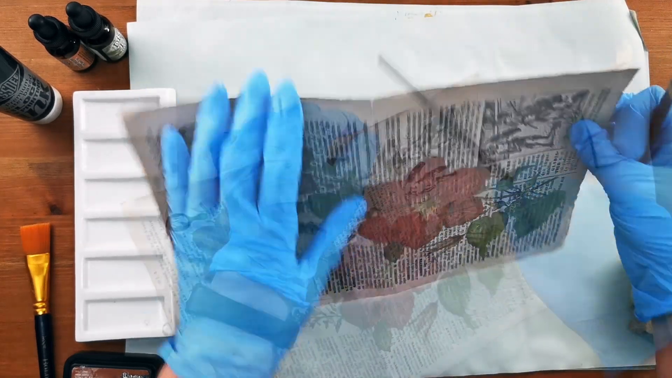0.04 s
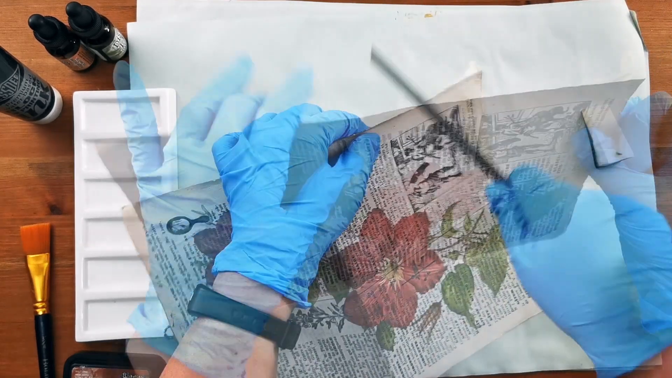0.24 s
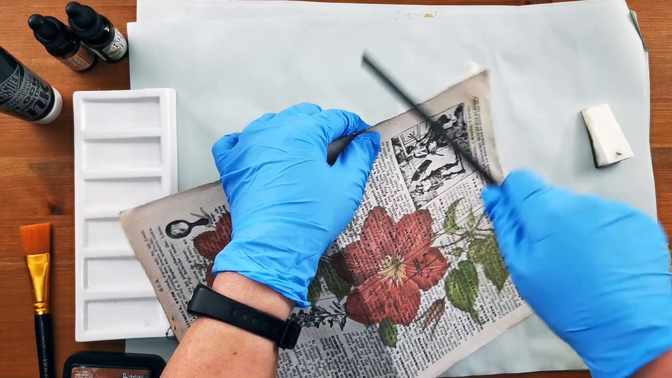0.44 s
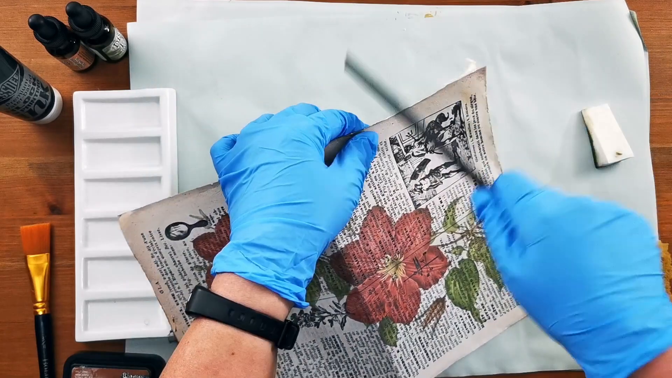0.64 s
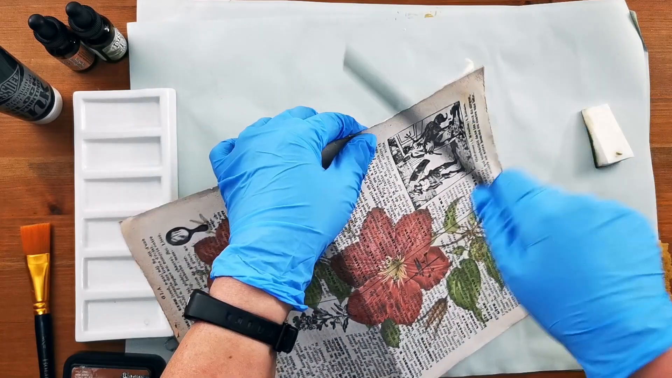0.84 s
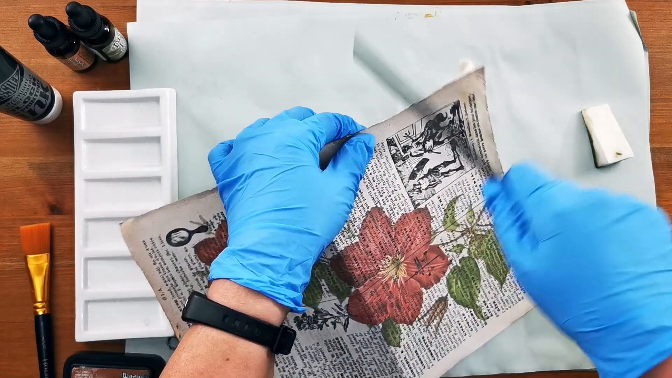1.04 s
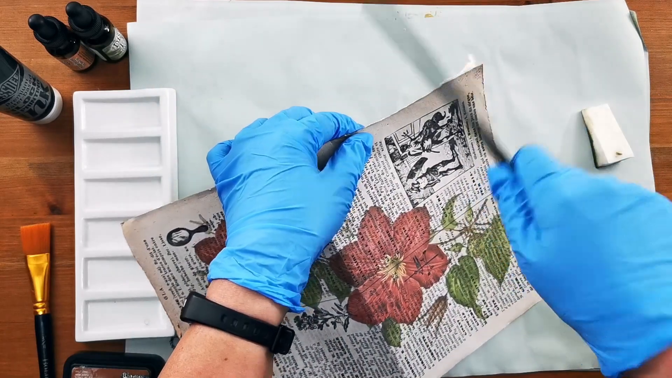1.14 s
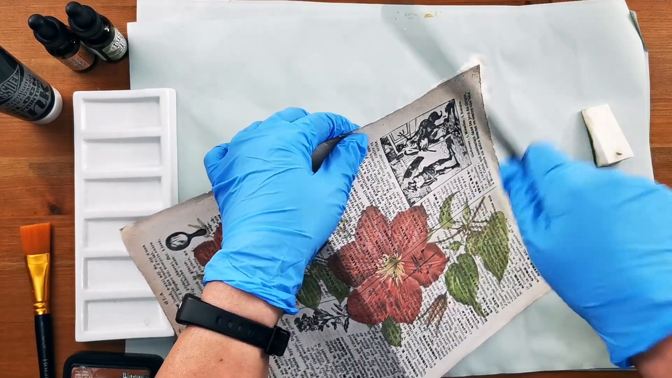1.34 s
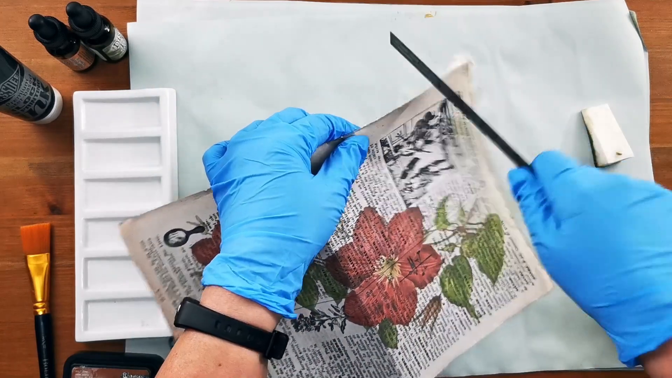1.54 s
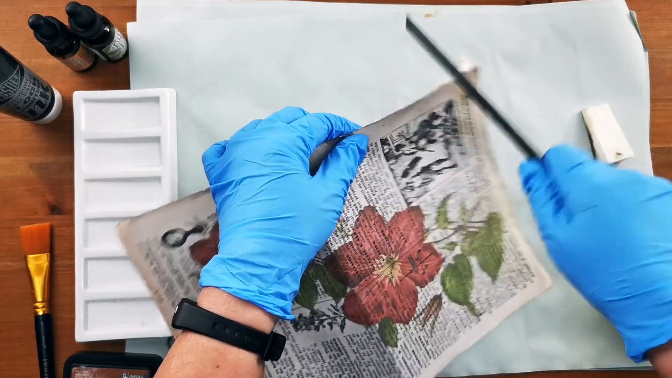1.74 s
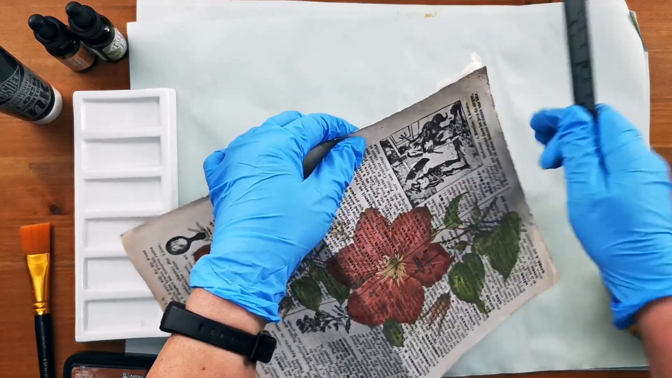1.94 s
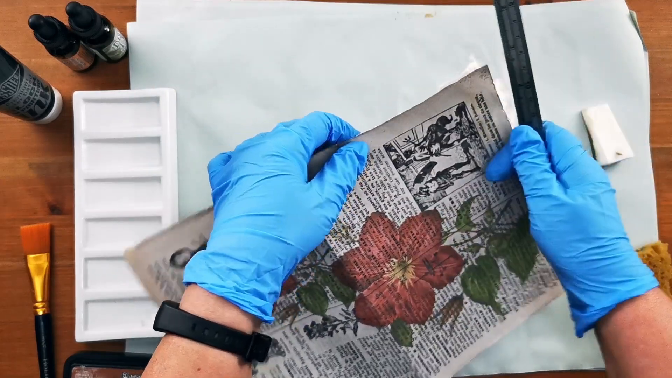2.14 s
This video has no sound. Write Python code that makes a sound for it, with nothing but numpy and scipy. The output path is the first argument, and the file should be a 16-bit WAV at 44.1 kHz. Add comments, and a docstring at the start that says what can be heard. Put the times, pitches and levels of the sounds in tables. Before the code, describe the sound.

A steel ruler is whipped along a stiff paper edge in short, hollow, clacking strokes. Paper rustles from 0 to 0.3 seconds, with a faint stroke at 0.1 and a firmer one at 0.3. Loud cracks follow roughly every 0.19 seconds until 1.8, with a tiny bright double tick near 0.95 and small late rebounds. Short room tails fade into light rustling around 1.9 to 2.2; close, bass-light, peaks clipped.

```python
"""A steel ruler is whipped along the edge of a stiff paper sheet over a craft table, about five strokes a second.
Each stroke excites decaying modes of sheet and blade (knock and crack), then a noisy room tail swells and fades.
The sheet rustles in gloved hands as shaped noise; light touches and small ticks ring as dying sines.
Low noise after each stroke is the table's shudder; the loudest blows overload the microphone and are clipped."""
import sys
import numpy as np
from scipy import signal
from scipy.fft import rfft, irfft
from scipy.io import wavfile
from scipy.ndimage import uniform_filter1d

SR = 44100
rng = np.random.default_rng(int(sys.argv[2]) if len(sys.argv) > 2 else 0)


def dump_mix(stems):
    """Bounce the given channels to the path in sys.argv[1] as a 16-bit WAV at rate SR."""
    frames = np.atleast_2d(stems).T  # one column per channel
    limited = np.clip(frames, -1, 1)  # hard clip at full scale
    pcm = np.round(limited * 32767).astype(np.int16)
    wavfile.write(sys.argv[1], SR, pcm)


def amplitude_ratio(level_db):
    """Convert a level in decibels to the matching linear amplitude (field) ratio."""
    exponent = np.asarray(level_db, float) / 20
    return 10 ** exponent


N = 97020  # samples

# Strokes of the ruler on the sheet. Each row: start in seconds, sheet blow in dB, hollow knock in dB, crack in dB,
# favoured sheet mode in Hz, favoured blade mode in Hz, room tail in dB, tail brightness in dB per octave.
RULER_STROKES = [(0.1102, -27.5, -35.5, -33, 1630, 4100, -31.5, -0.5),
                 (0.2948, -17, -19, -28.5, 1370, 5000, -29.5, -3),
                 (0.4718, -9, -11.5, -14.5, 1940, 4450, -25.5, -2.5),
                 (.6577, -15, -13, -14, 1370, 5800, -28, -1.5),
                 (0.8468, -16.5, -9, -28.5, 2440, 4680, -28, -4),
                 (1.0398, -15, -6, -15.5, 1830, 4660, -26, -3),
                 (1.2381, -9, -9, -21, 1370, 5000, -24.5, -3),
                 (1.4209, -8, -10, -12.5, 1100, 6500, -23.5, -3),
                 (1.6088, -11, -10, -12.5, 1070, 5900, -24, -3),
                 (1.7948, -12, -11.5, -28, 984, 4300, -24, -4.5)]


def evened(x):
    """Normalisation: scales a signal to rms 1."""
    return x / np.sqrt(np.mean(x ** 2) + 1e-20)


def read(points, hz):
    """Interpolation on a logarithmic frequency axis."""
    f, value = np.transpose(points)
    return np.interp(np.log(hz + 1), np.log(f + 1), value)


def add(mix, s, sound):
    """Superposition: sums a sound into the mix from time s."""
    part = mix[round(s * SR):][:len(sound)]
    part += sound[:len(part)]


def unit(points, hz):
    """Spectral envelope: amplitudes from a dB table, scaled to rms 1 over the bins."""
    return evened(amplitude_ratio(read(points, hz)))


def coloured(points, count):
    """Filtered noise: white noise weighted by a spectrum, rms 1."""
    spectrum = rfft(rng.standard_normal(count))
    gain = amplitude_ratio(read(points, np.fft.rfftfreq(count, 1 / SR)))
    return evened(irfft(spectrum * gain, count))


def noise(field, patchy_db, grainy_db):
    """Short-time synthesis: random spectra shaped by field(hz, t), with patches and per-frame flicker."""
    frames = N // 64 + 5
    hz = np.fft.rfftfreq(256, 1 / SR)[:, None]
    real, imag, patches = rng.standard_normal((frames, 129, 3)).T
    patches = uniform_filter1d(patches, size=6, axis=0)  # across frequency
    patches = evened(uniform_filter1d(patches, size=10, axis=1))  # across time
    flicker = evened(uniform_filter1d(rng.standard_normal(frames), size=3))
    shape = field(hz, np.arange(frames) * 64 / SR)
    z = (real + 1j * imag) * shape * amplitude_ratio(patchy_db * patches + grainy_db * flicker)
    return signal.istft(z, nperseg=256, noverlap=192)[1][:N] / 16


def struck(modes, detune, scatter_db, seconds, count=1):
    """Modal decay: dying sines, count randomly detuned lines per mode, scaled to a starting power of 1."""
    hz, db, t60 = np.transpose(list(modes) * count)[:, :, None]
    t = np.arange(0, seconds, 1 / SR)
    level_draw, pitch_draw = rng.standard_normal((len(hz), 2)).T[:, :, None]
    size = amplitude_ratio(db + scatter_db * level_draw)
    lines = size * amplitude_ratio(-60 * t / t60) * np.sin(2 * np.pi * hz * (1 + detune * pitch_draw) * t)
    return lines.sum(0) / np.sqrt((size ** 2).sum() / 2)


def favoured(modes, near_hz):
    """Position-dependent excitation: lifts the modes that the place of the blow excites best."""
    lift_db, width_octaves = 5, 0.18
    return [(hz, db + lift_db * np.exp(-(np.log2(hz / near_hz) / width_octaves) ** 2), t60)
            for hz, db, t60 in modes]


def burst(points, db, t60):
    """Exponential decay: a dying puff of coloured noise."""
    t = np.arange(0, .08, 1 / SR)
    return amplitude_ratio(db - 60 * t / t60) * coloured(points, count=len(t))


def room_quiet():
    """Background noise: a steady random signal with a fixed spectrum."""
    # Noise spectrum of the room. Each row: frequency in Hz, relative density in dB per Hz.
    room_spectrum = [(15, -35), (25, -17), (102, -3), (463, -19.5), (607, 5.5), (911, -3), (1650, 0),
                     (2220, -7), (4370, -7.5), (12500, -19), (16000, -21)]
    return amplitude_ratio(-53) * coloured(room_spectrum, count=N)


def rustle(hz, t):
    """Friction noise as gloved hands shift the sheet: powers of two long stretches and brief fidgets add."""
    # Rustling paper. Each row: frequency in Hz, relative density in dB per Hz.
    paper_spectrum = [(88, -45), (150, -34), (475, -33), (612, -12), (905, -31), (1340, -1), (1630, -13),
                      (1870, -4.5), (8070, -8.5), (16000, -17.5)]
    # Two long stretches. Each row: time in seconds, level in dB, brightness in dB per octave.
    stretches = [
        [(0.0, -37, -3.5), (0.084, -34.5, 0), (0.102, -43, 1.5), (0.108, -38, 4), (0.136, -28.5, 2.5),
         (0.176, -44, 6), (0.242, -36, 0), (0.286, -69, 13), (0.29, -60, 0)],
        [(1.88, -44.5, 5), (1.898, -46, -0.5), (1.954, -33.5, 3.5), (1.984, -43.5, 2), (2.1, -49.5, 0),
         (2.106, -46, -4), (2.138, -53, 7), (2.156, -45, -13.5), (2.17, -46, -2), (2.194, -42, 1.5),
         (2.2, -42, -13)],
    ]
    # Brief shifts of the sheet. Each row: centre in seconds, level in dB, half length in seconds.
    brief_shifts = [(0.357, -50, 0.01), (0.385, -59, .008), (0.465, -43.5, .015), (.63, -68, .015),
                    (0.999, -42, 0.016), (1.197, -66, .008), (1.357, -43.5, 0.017), (1.546, -43.5, 0.0077),
                    (1.719, -43, .012)]
    power = sum(amplitude_ratio(2 * db) * np.exp(-((t - s) / half_s) ** 2) for s, db, half_s in brief_shifts)
    for rows in stretches:
        s, db, tilt_db = np.transpose(rows)
        outside_s = np.maximum(np.maximum(s[0] - t, t - s[-1]), 0)
        level_db = np.interp(t, s, db) - 600 * outside_s  # fades at 600 dB/s beyond its ends
        octaves = np.log2((hz + 1000) / 5000)
        power = power + amplitude_ratio(2 * level_db + 2 * np.interp(t, s, tilt_db) * octaves)
    return unit(paper_spectrum, hz) * np.sqrt(power)


def blow(blow_db, knock_db, crack_db, sheet_hz, blade_hz):
    """Impact excitation: a quick cluster of ticks rings sheet and blade, with a knock, a slap and a crackle."""
    # Modes of the sheet over the table. Each row: frequency in Hz, relative level in dB, t60 in seconds.
    knock_modes = [(636.4, 17, 0.035), (560, -13, 0.006), (674, 13.5, 0.027), (747, 2, 0.026),
                   (850, 4, 0.0083), (304, -7, 0.032)]
    # Modes of the sheet alone. Each row: frequency in Hz, relative level in dB, t60 in seconds.
    sheet_modes = [(1056, -4.5, 0.065), (1370, 9.5, 0.015), (1798, 6.5, 0.019), (2146, 2.5, 0.016),
                   (2350, -5.5, 0.066), (2716, -15, 0.078), (3140, -7, 0.061), (3717, -0.5, 0.029),
                   (4250, -12, 0.012)]
    # Modes of the steel blade. Each row: frequency in Hz, relative level in dB, t60 in seconds.
    blade_modes = [(4540, -9.5, 0.012), (4950, -0.5, 0.011), (5240, -2.5, .012), (5780, -2, .013),
                   (6575, 1.5, .014), (7120, 1, 0.012), (7920, -8, 0.011), (7930, -7, 0.0081),
                   (9120, -3, 0.013), (10000, -5.5, 0.0089), (11330, -8, 0.0092), (12000, -3, .011),
                   (13000, -2, .01)]
    # Slap that goes with the blow. Each row: frequency in Hz, relative density in dB per Hz.
    slap_spectrum = [(300, -54), (600, 1.5), (1500, -4), (2400, -6), (3500, -12), (5500, -25), (16000, -64)]
    # Crackle that goes with the crack. Each row: frequency in Hz, relative density in dB per Hz.
    crackle_spectrum = [(1000, -52), (3000, -4.5), (4700, 5.5), (7000, -3.5), (11000, -5.5), (14000, -11.5),
                        (16000, -9)]
    contact_s, contact_ticks, later_size = .003, 10, .55  # largest later tick beside the first
    knock_rise_s = 0.0022

    draws = rng.random((contact_ticks, 2))
    hit = np.zeros(600)
    places = (draws[1:, 0] * contact_s * SR).astype(int)
    np.add.at(hit, places, later_size * (2 * draws[1:, 1] - 1))  # either sign
    hit[0] = 1

    t = np.arange(0, .08, 1 / SR)
    knock = struck(knock_modes, 0.0057, 0.54, len(t) / SR)[:len(t)]
    out = amplitude_ratio(knock_db) * (1 - np.exp(-t / knock_rise_s)) * knock
    for db, modes, hz in (blow_db, sheet_modes, sheet_hz), (crack_db, blade_modes, blade_hz):
        ring = struck(favoured(modes, hz), 0.042, 2.5, len(t) / SR, count=5)
        ring = np.convolve(ring, hit)[:len(t)]
        out = out + amplitude_ratio(db) * ring / np.std(ring[:SR // 200])  # level set over the first 5 ms
    slap = burst(slap_spectrum, blow_db - 2.5, 0.028)
    crackle = burst(crackle_spectrum, crack_db + 1, .024)
    return out + slap + crackle


def blows():
    """Repeated impact: superposes all landings and rebounds of the ruler."""
    # Rebounds of the ruler. Each row: start in seconds, sheet blow in dB, knock in dB, crack in dB,
    # favoured sheet mode in Hz, favoured blade mode in Hz.
    bounces = [(1.4491, -41, -41, -33.5, 3500, 4540), (1.4539, -24, -25, -38, 1010, 5000),
               (1.632, -27.5, -38, -49, 1100, 5000), (1.638, -23.5, -18, -31.5, 1920, 4940),
               (1.816, -23, -25, -45, 1190, 5000)]
    out = np.zeros(N)
    for row in list(RULER_STROKES) + list(bounces):
        add(out, row[0], blow(*row[1:6]))
    return out


def room_tail(hz, t):
    """Reverberation: after each blow a noisy tail swells slightly, then decays at a rate set by frequency."""
    # Room tail. Each row: frequency in Hz, relative density in dB per Hz.
    tail_spectrum = [(59, -49), (100, -47), (322, -22.5), (801, -3), (1010, -13), (1450, -1.5),
                     (2040, -6.5), (2220, -9.5), (3470, -9), (11600, -15), (16000, -20)]
    # Decay of the room tail. Each row: frequency in Hz, t60 in seconds.
    tail_decay = [(250, 0.16), (660, 0.3), (1740, 0.34), (4590, 0.33), (12100, 0.26)]
    peak_s, rise_s, start_db = 0.035, 0.0051, -1.5
    power = 0
    for s, *_, db, tilt_db in RULER_STROKES:
        u = t - s - peak_s
        swell = np.exp(-(np.minimum(u, 0) / rise_s) ** 2)
        rise = amplitude_ratio(start_db) + (1 - amplitude_ratio(start_db)) * swell
        tilt = tilt_db * np.log2((hz + 100) / 1500)
        fade = amplitude_ratio(db + tilt - 60 * np.maximum(u, 0) / read(tail_decay, hz))
        begun = t > s + .007
        power = power + (begun * rise * fade) ** 2
    return unit(tail_spectrum, hz) * np.sqrt(power)


def thuds():
    """Structure-borne sound: each stroke leaves a faint low shudder in the table, rising then decaying."""
    # Shudder of the table top. Each row: frequency in Hz, relative density in dB per Hz.
    table_spectrum = [(25, -6), (60, -11), (105, -5), (160, -7.5), (300, -4), (450, -25), (900, -55)]
    over_tail_db, rise_s, t60 = -23.5, 0.018, 0.31
    strokes = np.array(RULER_STROKES)
    u = np.maximum(np.arange(N) / SR - strokes[:, :1], 0)
    size = amplitude_ratio(strokes[:, 6:7] - 60 * u / t60) * (1 - np.exp(-u / rise_s))
    return amplitude_ratio(over_tail_db) * size.sum(0) * coloured(table_spectrum, count=N)


def touches():
    """Free vibration: light touches leave the ruler ringing in its own modes."""
    # Modes of the ruler. Each row: frequency in Hz, relative level in dB, t60 in seconds.
    ruler_modes = [(12530, 3, .17), (10900, -8, .12), (9100, -7, .12), (8150, -5, 0.102), (7200, -10, .1),
                   (13250, -19, .1), (15200, -14, .06)]
    # Light touches. Each row: start in seconds, level in dB, favoured mode in Hz.
    light_touches = [(0.341, -48, 12500), (.398, -50, 9100), (.5, -62, 12500), (.575, -60, 8150),
                     (.728, -55, 13000), (.868, -61, 12500), (0.937, -53, 15200), (.968, -49, 7200),
                     (1.714, -52, 8150)]
    rise_s = 0.0046
    out = np.zeros(N)
    for s, db, hz in light_touches:
        ring = struck(favoured(ruler_modes, hz), 0.0031, 2.3, .25, count=2)
        onset = np.minimum(np.arange(len(ring)) / (rise_s * SR), 1)
        add(out, s, amplitude_ratio(db) * ring * onset)
    return out


def small_ticks():
    """Impact ringing: a bright double tick and a weaker third, each a noise snap with short modes."""
    # Small ticks. Each row: start in seconds, level in dB.
    tick_times = [(0.9509, -25), (0.9528, -26), (0.959, -38)]
    # Modes of a tick. Each row: frequency in Hz, relative level in dB, t60 in seconds.
    tick_modes = [(3460, -15, 0.04), (4170, -3.5, 0.016), (7070, 4.5, 0.018), (7370, -12, 0.024),
                  (8800, -16, 0.034), (10730, -10, 0.03), (12290, -21, 0.044), (14210, -27, 0.05),
                  (15200, -24, 0.039)]
    # Snap of a tick. Each row: frequency in Hz, relative density in dB per Hz.
    snap_spectrum = [(900, -30), (2000, -4), (4300, 6), (5500, -6), (7100, -13), (9000, -12), (15000, -8)]
    out = np.zeros(N)
    for s, db in tick_times:
        add(out, s, burst(snap_spectrum, db - 4, 0.021))
        add(out, s, amplitude_ratio(db) * struck(tick_modes, 0.045, 1.7, .06, count=3))
    return out


def scene():
    """Superposition of the sources; the hits are high-passed, as the microphone picks up little bass."""
    thin_hz = 523
    tail = noise(room_tail, patchy_db=0.5, grainy_db=1.4)
    rustling = noise(rustle, patchy_db=1.5, grainy_db=1.0)
    high_pass = signal.butter(3, thin_hz, "high", fs=SR, output="sos")
    hits = signal.sosfilt(high_pass, blows() + touches() + small_ticks())
    return (hits + thuds() + tail + rustling + room_quiet())[None]


def top_cut(x):
    """Nothing passes above the cut-off."""
    return signal.sosfilt(signal.butter(12, 16440, fs=SR, output="sos"), x)


def record(dry):
    """Overload and band limiting: peaks are clipped, then a linear-phase low-pass cuts the top."""
    ceiling, edge_hz = .995, 15400
    low_pass = signal.firwin(161, edge_hz, window=("kaiser", 8), fs=SR)[None]
    clipped = np.clip(dry, -ceiling, ceiling)
    mix = signal.oaconvolve(clipped, low_pass, "same")
    return top_cut(mix)


dry = scene()
out = record(dry)
dump_mix(out)
```